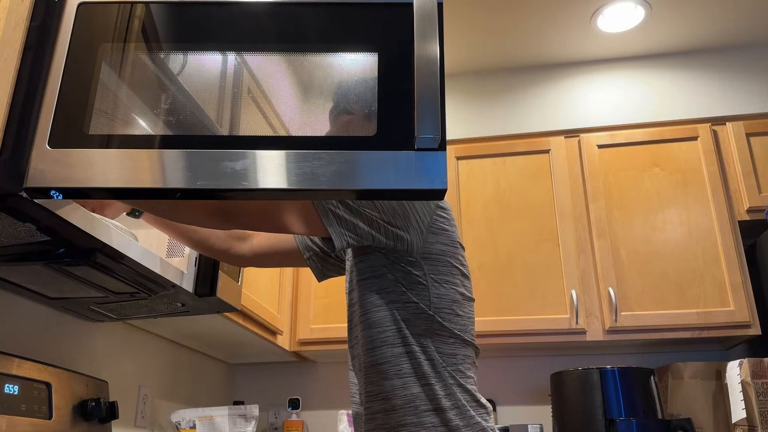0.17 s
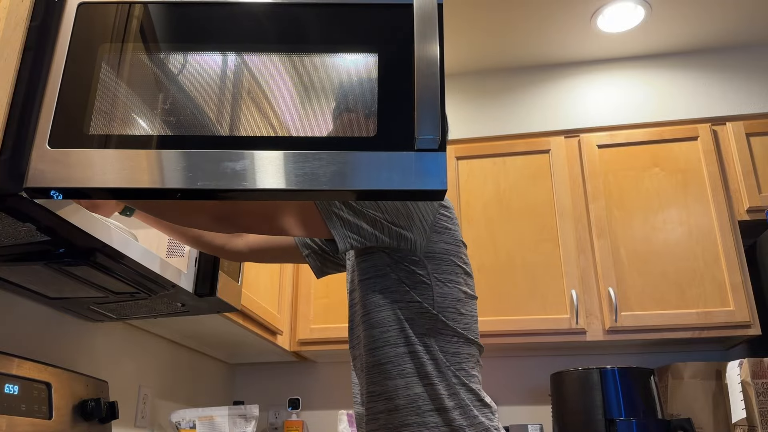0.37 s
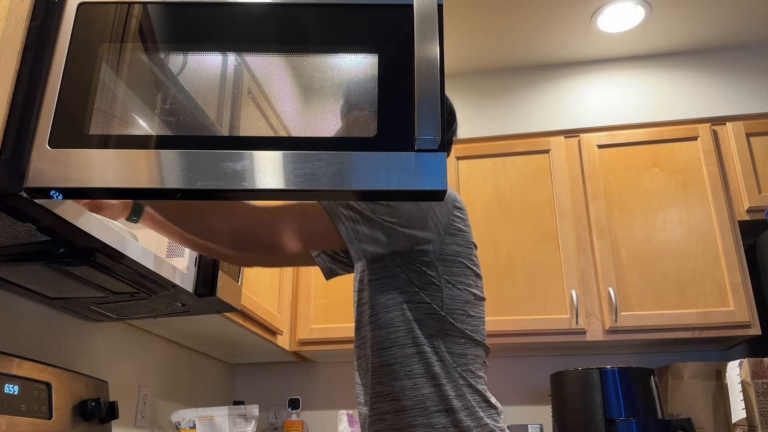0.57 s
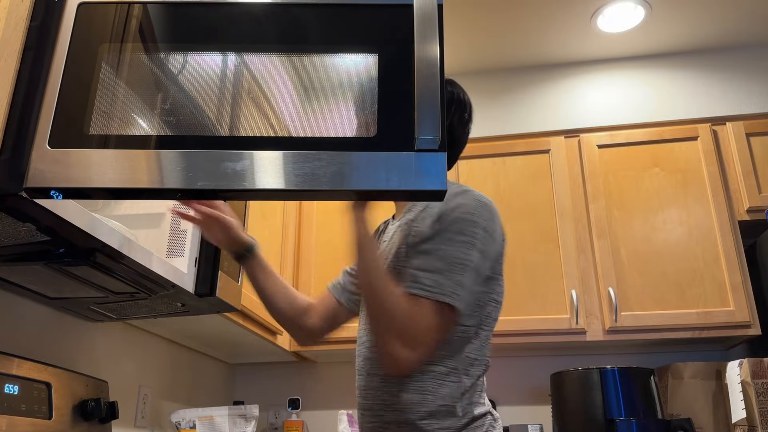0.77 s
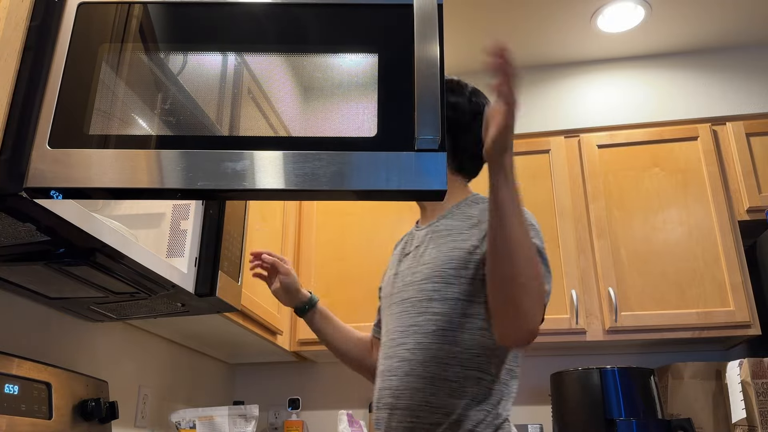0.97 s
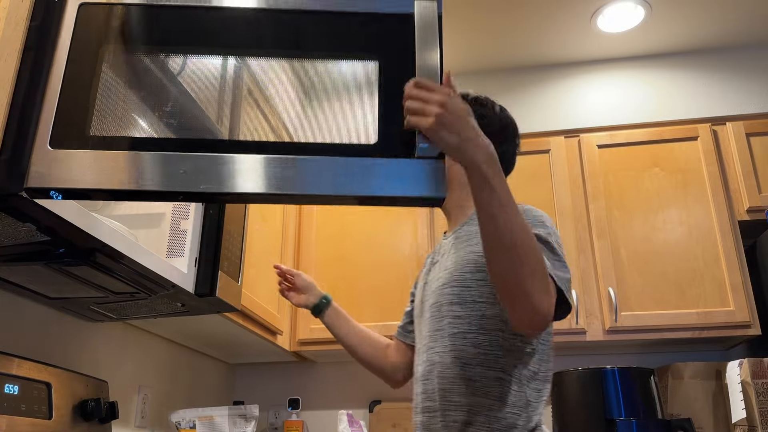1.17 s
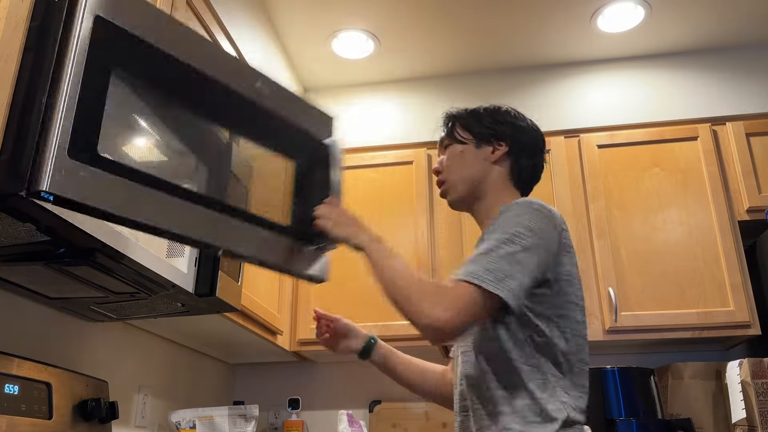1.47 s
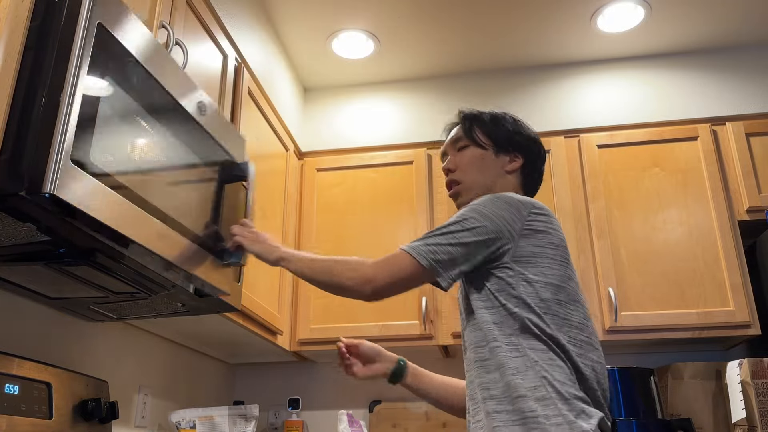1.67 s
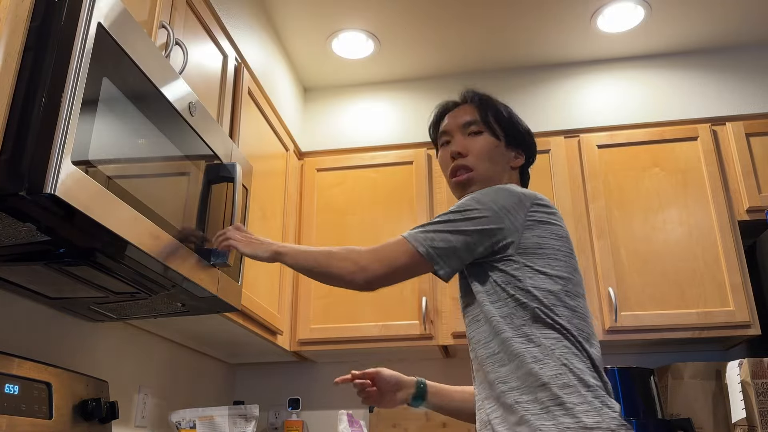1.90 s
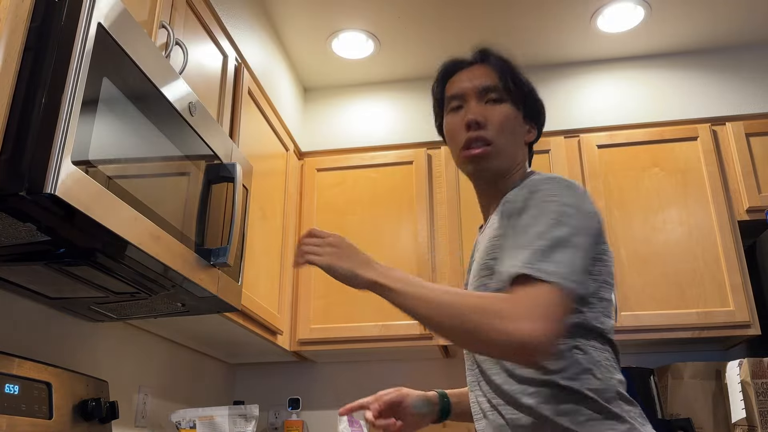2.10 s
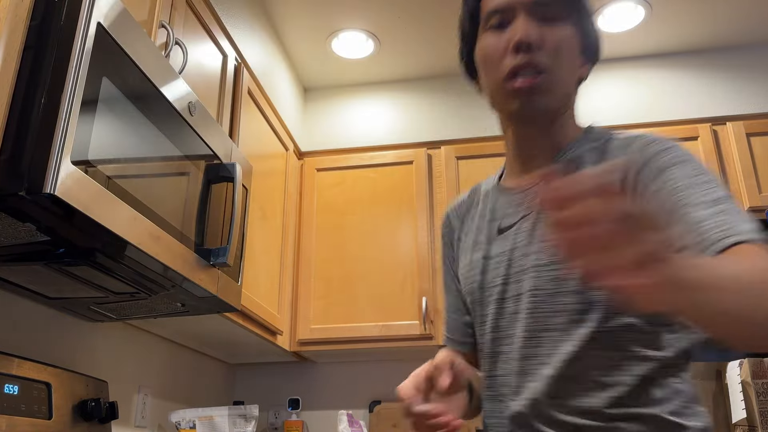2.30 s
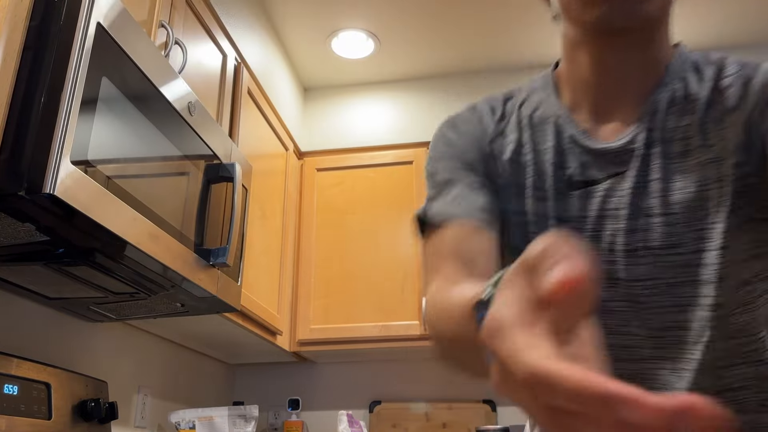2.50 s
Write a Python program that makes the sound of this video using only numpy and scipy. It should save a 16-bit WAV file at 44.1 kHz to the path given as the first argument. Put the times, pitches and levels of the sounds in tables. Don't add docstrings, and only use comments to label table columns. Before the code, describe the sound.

A microwave door slams loudly at about 1.7-1.9 seconds: hooks scrape, the latch snaps, and the steel box thunks and rattles briefly, echoing through the kitchen. Before it, a plastic container slides faintly and lands dully on the glass plate near 0.45, its lid ticks at 0.7, and fingers and a ring tap the door around 1.1. Clothes rustle, strongest near 2.5, over low hum.

```python
import sys
import numpy as np
from scipy import signal
from scipy.fft import rfft, irfft, next_fast_len
from scipy.io import wavfile

SR = 44100
rng = np.random.default_rng(int(sys.argv[2]) if len(sys.argv) > 2 else 0)


def store_pcm(level_fs):
    pcm = np.round(np.clip(level_fs, -1, 1) * 32767).astype(np.int16)
    wavfile.write(sys.argv[1], SR, np.atleast_2d(pcm).T)


def gain_from_db(level_db):
    decades = np.asarray(level_db, float) / 20
    return 10 ** decades


N = 116865

# (pitch [Hz], time to fall 60 dB [s])
ROOM_T60 = [(60, 0.77), (250, 0.74), (1000, 0.64), (4000, 0.62), (8000, 0.5), (14000, 0.14)]
# (pitch [Hz], level [dB per Hz])
CLOTH_TONE = [(76, -4), (130, -4), (307, -20.5), (391, -0.5), (432, -20.5), (756, -13), (2830, -29.5),
              (10200, -34), (15500, -50)]


def at_hz(points, hz):
    p = np.array(points)
    return np.interp(np.log(np.maximum(hz, 1)), np.log(p[:, 0]), p[:, 1])


def rms_one(x):
    return x / np.sqrt(np.mean(x ** 2))


def low_cut(x, hz, order=2):
    return signal.sosfilt(signal.butter(order, hz, "high", fs=SR, output="sos"), x)


def drift(rate):
    r = np.exp(-80 * np.pi * rate / SR)
    noise = rng.standard_normal(N // 40 + 2002)
    slow = signal.lfilter([1], [1, -2 * r, r * r], noise)[2000:]
    return np.interp(np.arange(N) / 40, np.arange(len(slow)), rms_one(slow))


def colour(x, spectrum):
    gain = gain_from_db(np.maximum(at_hz(spectrum, np.fft.rfftfreq(4096, 1 / SR)), -70))
    cep = irfft(np.log(rms_one(gain)))
    cep[1:2048] *= 2
    cep[2049:] = 0
    return signal.fftconvolve(x, irfft(np.exp(rfft(cep))))[:N]


def bands(length, gain_for):
    out, edges = 0, 22 * 2 ** np.arange(0, 10, .5)
    white = rng.standard_normal((2, 2, length + SR // 4))
    for k, (low, high) in enumerate(zip(edges, edges[1:])):
        band_filter = signal.butter(2, [low, high], "band", fs=SR, output="sos")
        pair = signal.sosfilt(band_filter, white[k % 2])
        out = out + pair[:, SR // 4:] * gain_for(np.sqrt(low * high))
    return out


def rattle(events, spectrum, attack_s):
    out, t = np.zeros(N), np.arange(SR // 5) / SR
    hz = np.fft.rfftfreq(len(t), 1 / SR)
    for s, db, tilt, length in events:
        clicks = rng.standard_normal(len(t)) * gain_from_db(1.5 * rng.exponential(1, len(t))) * .36
        burst = clicks * np.exp(-t / max(length, .001)) * np.minimum(t / attack_s, 1)
        brightness = gain_from_db(tilt * np.log2(np.maximum(hz, 300) / 3000))
        burst = irfft(rfft(burst) * brightness, len(t))
        i = int(s * SR)
        out[i:i + len(t)] += gain_from_db(db) * burst[:N - i]
    return colour(out, spectrum)


def struck(blows, modes, soft_hz, turn):
    out, chance = np.zeros(N), rng.normal(0, 1, (len(blows), len(modes)))
    s, db = np.transpose(blows)
    for k, (hz, level_db, t60) in enumerate(modes):
        clicks = np.full(N, 1e-18)
        clicks[(s * SR).astype(int)] = gain_from_db(db + level_db + 2.25 * chance[:, k]) * turn ** k
        r, w = gain_from_db(-60 / (t60 * SR)), 2 * np.pi * hz / SR
        out += signal.lfilter([0, np.sin(w)], [1, -2 * r * np.cos(w), r * r], clicks)
    return signal.sosfilt(signal.butter(2, soft_hz, fs=SR, output="sos"), out)


def door_slam():
    # (time [s], level [dB])
    box_hits = [
        (1.708, -23.5),
        (1.7655, -23.5),
        (1.7755, -14),
        (1.7845, -1.5),
        (1.7995, -11.5),
        (1.8165, -16.5),
        (1.865, -23),
    ]
    # (pitch [Hz], level [dB], time to fall 60 dB [s])
    box = [(59.7, -29, 0.66), (94, -14.5, 0.095), (124.7, -4.5, 0.1), (157, -9.5, 0.25), (210.2, -14, 0.22),
           (259.6, -12.5, 0.27), (314, -12, 0.2), (392, -25, 1), (444, -5.5, 0.098), (481.4, -17.5, .3),
           (546.5, -10.5, 0.2), (654, -3, 0.032), (816, -21, 0.2), (1060, -11, 0.22)]
    # (time [s], level [dB])
    panel_hits = [
        (1.7655, -2.5),
        (1.771, -9.5),
        (1.777, -18),
        (1.801, -19.5),
        (1.824, -19.5),
    ]
    # (pitch [Hz], level [dB], time to fall 60 dB [s])
    panel = [(241, -1, 0.017), (327, -5.5, 0.055), (444.3, -0.5, 0.09), (631.5, -8, 0.19), (870, -1, 0.034),
             (1164, 4.5, 0.019), (2074, -5, 0.041)]
    # (time [s], level [dB])
    frame_hits = [
        (1.8175, -17.5),
        (1.8235, -15.5),
        (1.836, -14.5),
        (1.877, -23.5),
        (1.886, -29),
        (2.012, -49),
    ]
    # (pitch [Hz], level [dB], time to fall 60 dB [s])
    frame = [(226, -4.5, 0.057), (258, -9.5, 0.107), (264, 4, 0.115), (282.5, -22, .1), (393, 0, 0.2),
             (590, -12, .1), (626, -14, 0.061)]
    slam = struck(box_hits, box, 1350, 0.89) + struck(panel_hits, panel, 2200, 0.87)
    return slam + struck(frame_hits, frame, 1600, 0.7)


def hook_judder():
    # (time [s], level [dB])
    jerks = [
        (1.7035, -25.5),
        (1.707, -31),
        (1.711, -21),
        (1.716, -27),
        (1.7215, -41),
        (1.7265, -20.5),
        (1.732, -40),
        (1.741, -33.5),
        (1.749, -28.5),
    ]
    # (pitch [Hz], level [dB], time to fall 60 dB [s])
    plastic = [(233, -6.5, 0.056), (360, -14, 0.087), (458, -3, 0.048), (499, -3, 0.12), (685, -2, 0.044),
               (899, -1.5, 0.038), (1128, 0.5, .05), (2013, -3.5, 0.027), (2283, -6.5, 0.056)]
    return struck(jerks, plastic, 2000, -0.99)


def latch_clicks():
    # (time [s], peak level [dB], tilt [dB per octave], rattle length [s])
    hook = [
        (1.7012, -19, 0.75, 0.025),
    ]
    # (pitch [Hz], level [dB per Hz])
    hook_tone = [(200, -1.5), (900, -4.5), (2200, -2.5), (6300, -8), (7500, -17.5), (16000, -30)]
    # (time [s], peak level [dB], tilt [dB per octave], rattle length [s])
    latch = [
        (1.7355, -12, -1, 0.009),
        (1.743, -18.5, -2, 0.016),
        (1.7525, -9, -2, 0.0074),
        (1.7565, -10, 1.5, 0.0044),
        (1.7612, -3, 1.5, 0.0072),
    ]
    # (pitch [Hz], level [dB per Hz])
    latch_tone = [(180, -23), (350, 1), (1000, 1), (1500, -5), (2100, -2), (3000, -12.5), (4500, -9),
                  (7000, -12), (16000, -24.5)]
    return rattle(hook, hook_tone, 0.00039) + rattle(latch, latch_tone, 0.00035)


def low_swells():
    # (start [s], length [s], pitch [Hz], level [dB])
    swings = [
        (.28, .09, 55, -46),
        (1.09, .2, 70, -39.5),
        (1.63, .07, 140, -43),
        (1.44, .24, 222, -57),
        (1.87, .14, 58, -29),
        (2.005, .17, 265, -43),
        (2.12, .22, 385, -56),
    ]
    t, out = np.arange(N) / SR, 0
    for s, length, hz, db in swings:
        swell = np.clip(np.minimum((t - s) / 0.018, (s + length - t) / 0.065), 0, 1)
        out = out + gain_from_db(db) * np.sin(2 * np.pi * hz * (t - s)) * swell
    return out


def set_down():
    # (time [s], level [dB])
    landings = [
        (.4555, -41),
        (.461, -35.5),
        (.478, -43),
        (.488, -39),
        (.509, -46.5),
        (.7, -51),
    ]
    # (pitch [Hz], level [dB], time to fall 60 dB [s])
    plate = [(81, -3, 0.17), (146.5, 0, 0.27), (167, -2.5, 0.14), (224, -14, 0.15), (325, -5.5, 0.13),
             (365.7, 0.5, 0.15), (513, -12.5, 0.088), (654, -6, 0.059), (760, -15, 0.05),
             (1004, -7.5, 0.058), (1190, -5, 0.039)]
    return struck(landings, plate, 1400, -1.044)


def container_drag():
    # (time [s], level [dB])
    ridges = [
        (.195, -65),
        (.207, -53),
        (.225, -53),
        (.243, -59),
        (.305, -54),
        (.322, -56),
        (.338, -54),
        (.432, -53),
        (.442, -46),
    ]
    # (pitch [Hz], level [dB], time to fall 60 dB [s])
    base = [(720, -7, 0.078), (774, 2, .07), (836, -4, 0.053), (960, -2, 0.083), (1123, -5, 0.069),
            (1350, -4, 0.065)]
    return struck(ridges, base, 1400, -1.07)


def lid():
    # (time [s], peak level [dB], tilt [dB per octave], rattle length [s])
    tick = [
        (0.6989, -32.5, 3.5, 0.028),
    ]
    # (pitch [Hz], level [dB per Hz])
    tick_tone = [(400, -6), (800, 13), (1200, 0.5), (2200, -5.5), (4300, -17.5), (5700, -4), (7000, -14.5),
                 (10500, -14.5), (16000, -32)]
    # (pitch [Hz], level [dB], time to fall 60 dB [s])
    lid_modes = [(867, -9, .3), (1523, -12, .3), (2300, -12, .06), (3400, -10, .12), (5300, -6, .25),
                 (5620, -1, .3), (5820, 0, .35), (6150, -6, .25)]
    ringing = struck([(tick[0][0] + 0.0025, -48.5)], lid_modes, 14000, -0.81)
    return rattle(tick, tick_tone, 0.00084), ringing


def door_grip():
    # (time [s], level [dB])
    fingers = [
        (1.083, -48.5),
        (1.114, -38.5),
        (1.131, -41.5),
        (1.165, -43),
    ]
    # (pitch [Hz], level [dB], time to fall 60 dB [s])
    door = [(150.7, -9.5, 0.64), (222.8, 0, 0.22), (266, 0.5, 0.12), (296, 2.5, 0.052), (400, -14.5, 0.08),
            (559, -18.5, 0.11)]
    return struck(fingers, door, 1200, -1.273)


def finger_ring():
    # (time [s], peak level [dB], tilt [dB per octave], rattle length [s])
    ticks = [
        (1.1633, -31, 0.33, 0.0037),
        (1.174, -41, -0.99, 0.0073),
    ]
    # (pitch [Hz], level [dB per Hz])
    ring_tone = [(400, -28), (800, 9.5), (1400, -12), (2300, -5), (3500, -14), (5000, -8), (9000, -11),
                 (16000, -26)]
    # (pitch [Hz], level [dB], time to fall 60 dB [s])
    ring_modes = [(1310, -2, 0.039), (2490, -4, .03), (3430, 3, 0.031), (4320, -6.5, 0.037),
                  (5500, -13, 0.025), (6100, -3, .025), (7680, -4, .02)]
    return rattle(ticks, ring_tone, 0.00018) + struck([(ticks[0][0], -45)], ring_modes, 8000, -1.06)


def tap_and_scuffs():
    # (time [s], peak level [dB], tilt [dB per octave], rattle length [s])
    tap = [
        (.107, -43, .1, 0.019),
    ]
    # (pitch [Hz], level [dB per Hz])
    tap_tone = [(1500, -5.5), (2600, -6.5), (3500, -0.5), (4800, -11), (5500, -17), (16000, -27)]
    # (time [s], peak level [dB], tilt [dB per octave], rattle length [s])
    scuffs = [
        (.001, -30.5, -3, 0.0071),
        (.198, -34, 1, 0.036),
        (.425, -31.5, -0.5, 0.023),
        (.448, -27, 0.64, 0.056),
        (1.075, -45.5, 2, 0.026),
        (1.36, -47.5, 1.1, 0.064),
        (2.178, -39.5, 1, 0.037),
        (2.331, -34.5, -2, 0.013),
    ]
    return rattle(tap, tap_tone, 0.0033) + low_cut(rattle(scuffs, CLOTH_TONE, 0.011), 450)


def clothes():
    # (time [s], level [dB], brightness [dB per octave])
    moving = [
        [(0.0, -54.5, -0.7), (0.11, -60.5, -0.6), (0.33, -49.5, 2.5), (0.604, -58.5, -2), (0.846, -63.5, 0.5),
         (0.92, -68.5, -1.5), (1.142, -69.5, -2.5), (1.28, -62.5, -2), (1.438, -74, -4), (1.66, -69, -3)],
    ]
    # (time [s], level [dB], brightness [dB per octave])
    leaving = [
        (2.0, -51.5, -3),
        (2.2, -52.5, -1),
        (2.33, -52, -0.1),
        (2.4, -54, -0.72),
        (2.47, -48, 0.5),
        (2.65, -59.5, -2.5),
    ]
    s, *columns = np.transpose([*np.reshape(moving, (-1, 3)), *leaving])
    db, bright = [np.interp(np.arange(N) / SR, s, c) for c in columns]
    together = 1.2 * drift(8)

    def rubbing(hz):
        wander = together + 2.84 * drift(10)
        return gain_from_db(at_hz(CLOTH_TONE, hz) + 24.0 + db + bright * np.log2(hz / 3000) + wander)
    return bands(N, rubbing)


def kitchen_hum():
    # (pitch [Hz], level [dB per Hz])
    hum_tone = [(25, 11.5), (59, 1), (148, -17), (221, 1), (349, -9), (945, -36), (1500, -34),
                (7000, -34.5), (16000, -81)]
    hum = rms_one(bands(N, lambda hz: gain_from_db(at_hz(hum_tone, hz) + 2.5 * drift(15))))
    hiss = low_cut(rng.standard_normal((2, N)), 12000)
    return gain_from_db(-55.5) * hum + gain_from_db(-78) * hiss


def room_echo():
    t, onset_s = np.arange(SR) / SR, 0.00029
    tail = bands(SR, lambda hz: gain_from_db(-60 * t / at_hz(ROOM_T60, hz))) * np.minimum(t / onset_s, 1)
    return tail / np.sqrt(np.sum(tail[0] ** 2))


def diffuse(x):
    def stored(hz):
        edges = [hz * 2 ** -.25, hz * 2 ** .25]
        band = signal.sosfilt(signal.butter(2, edges, "band", fs=SR, output="sos"), x + 1e-18)
        keep = gain_from_db(-120 / (at_hz(ROOM_T60, hz) * SR))
        return np.sqrt(signal.lfilter([1 - keep], [1, -keep], band ** 2) * SR / (.7 * hz))
    return bands(N, stored)


def microphones(pair):
    # (pitch [Hz], likeness [0 to 1])
    likeness = [(100, 0.88), (350, 0.5), (900, 0.073), (2400, 0.44), (6000, 0.18), (8000, 0.66),
                (11500, 0.37), (16000, 1)]
    # (pitch [Hz], level difference [dB])
    left_db = [(60, 0.5), (350, 4), (850, -1.5), (1300, 3.5), (2500, 1.5), (6000, 4.5), (9500, 0)]
    # (pitch [Hz], lead [radians])
    lead = [(100, 0), (2800, .9), (5000, .4), (6800, 1.1), (8100, 2.7), (10800, 0), (13000, 0),
            (16000, -2.5)]
    size = next_fast_len(N + 4096)
    hz = np.fft.rfftfreq(size, 1 / SR)
    mid, side = rfft(pair, size)
    alike = np.clip(at_hz(likeness, hz), 0, 1)
    turn = gain_from_db(at_hz(left_db, hz) / 2) * np.exp(.5j * at_hz(lead, hz))
    common, apart = np.sqrt((1 + alike) / 2) * mid, np.sqrt((1 - alike) / 2) * side
    return irfft([(common + apart) * turn, (common - apart) / turn], size)[:, :N]


def scene():
    slam = door_slam() + hook_judder()
    lid_tick, lid_ringing = lid()
    sharp = latch_clicks() + lid_tick + tap_and_scuffs()
    dull = set_down() + door_grip() + lid_ringing
    ring = finger_ring()
    echo = gain_from_db(-9) * signal.fftconvolve([dull], room_echo(), axes=1)[:, :N]
    echo = echo + diffuse(gain_from_db(-5.5) * sharp + gain_from_db(-5) * ring + gain_from_db(-9) * slam)
    direct = sharp + slam + dull + container_drag() + ring + low_swells()
    return microphones(echo + clothes() + kitchen_hum() + direct * [[1], [.45]])


def low_pass(x):
    return signal.sosfilt(signal.butter(12, 15660, fs=SR, output="sos"), x)


def record(dry):
    x = low_cut(dry * gain_from_db(4), 48, order=4)
    x = signal.sosfilt(signal.cheby2(12, 60, 16600, fs=SR, output="sos"), x)
    overloaded = np.tanh(x / 1.696) * 1.613
    return low_pass(np.clip(overloaded, -1, 1))


dry = scene()
out = record(dry)
store_pcm(out)
```